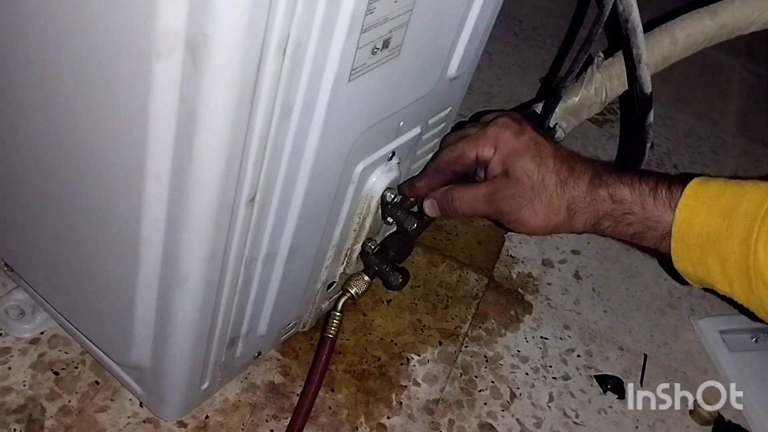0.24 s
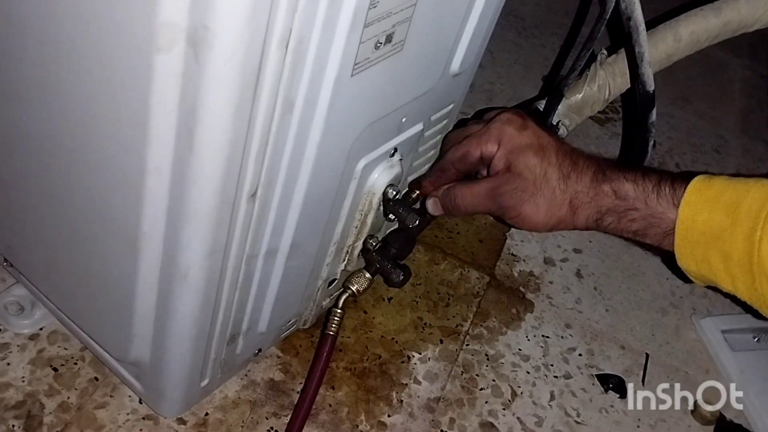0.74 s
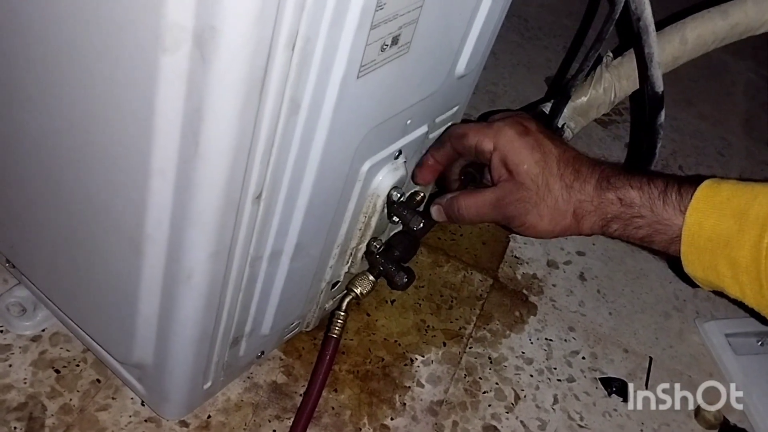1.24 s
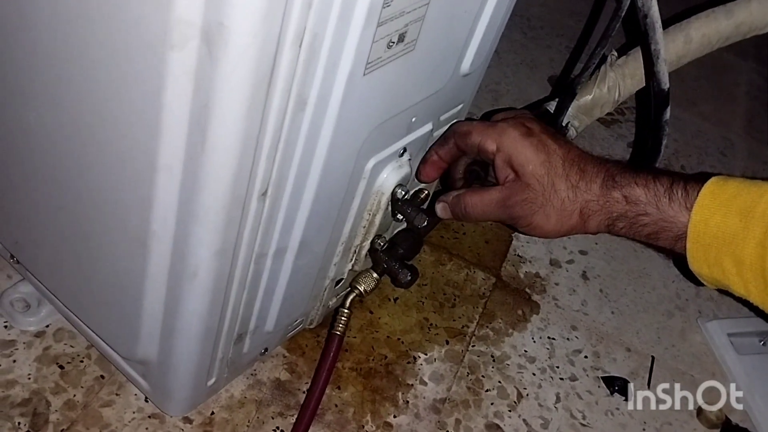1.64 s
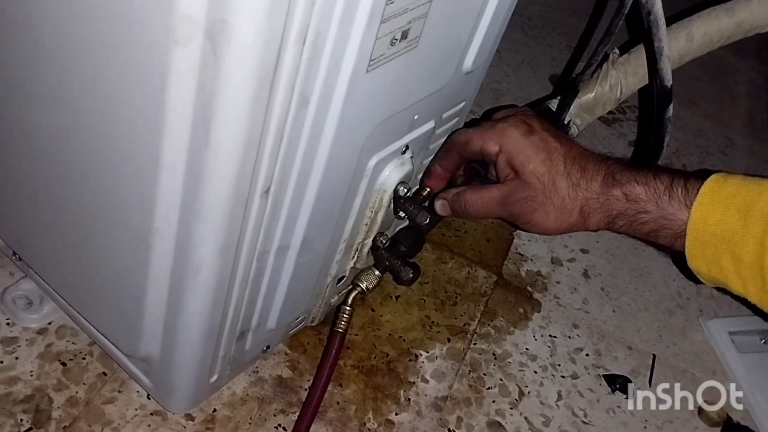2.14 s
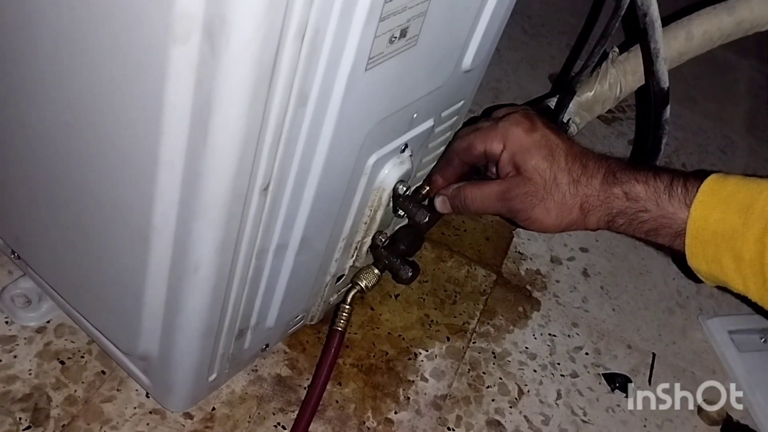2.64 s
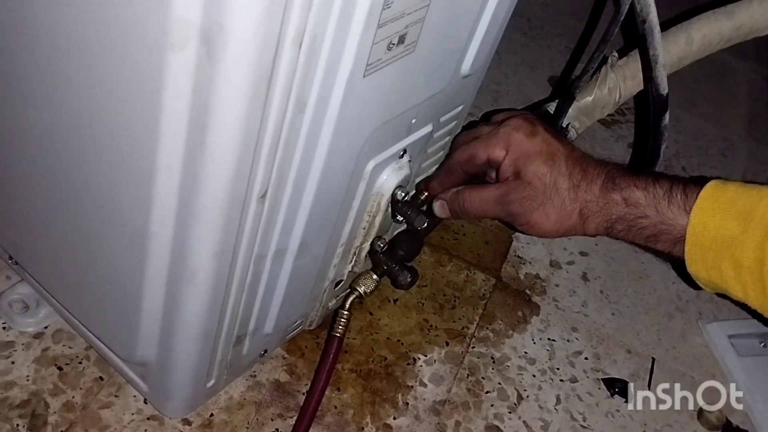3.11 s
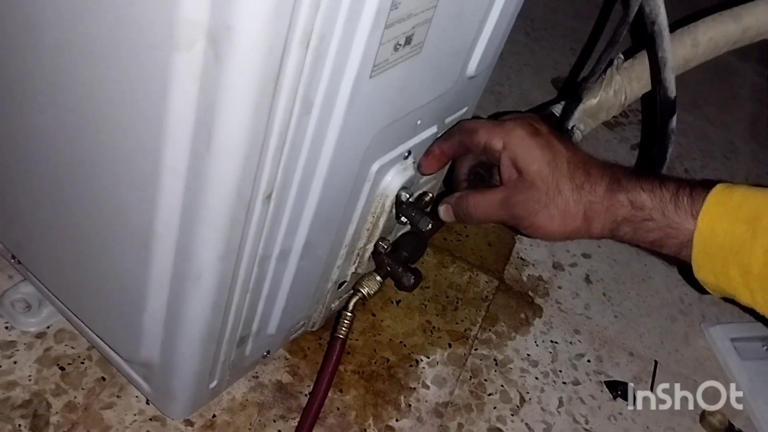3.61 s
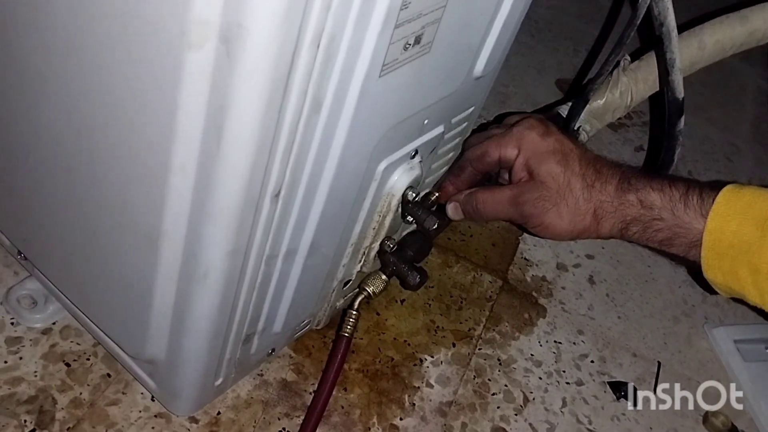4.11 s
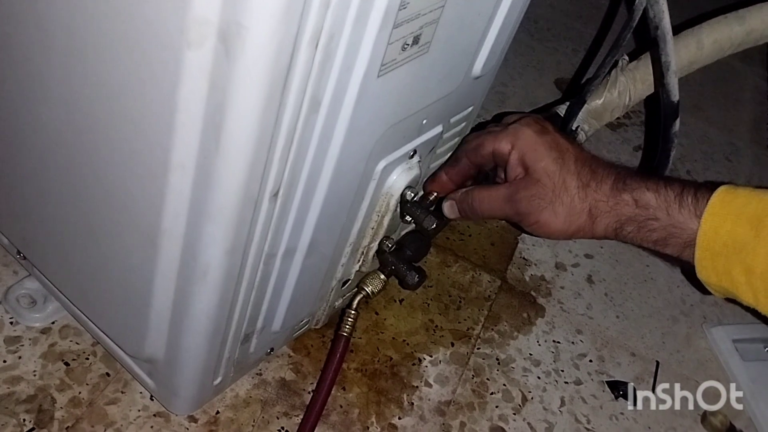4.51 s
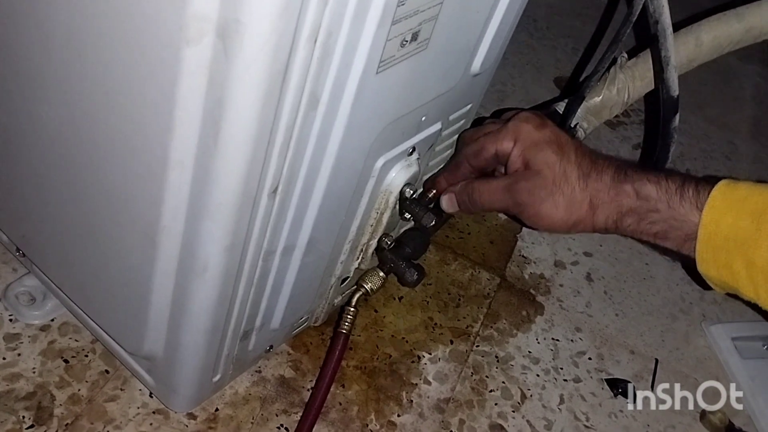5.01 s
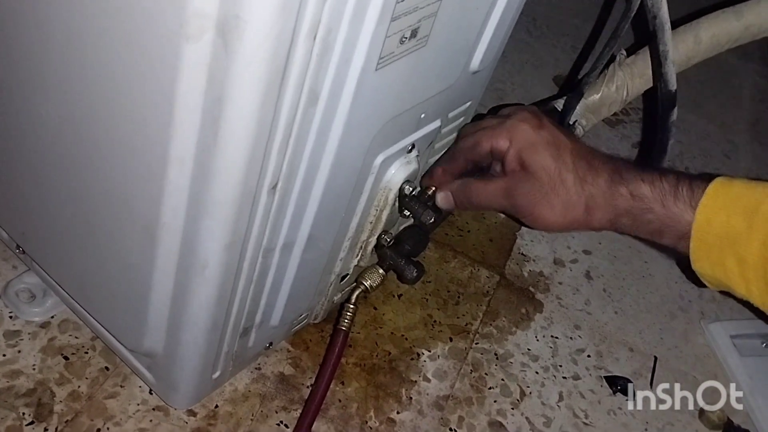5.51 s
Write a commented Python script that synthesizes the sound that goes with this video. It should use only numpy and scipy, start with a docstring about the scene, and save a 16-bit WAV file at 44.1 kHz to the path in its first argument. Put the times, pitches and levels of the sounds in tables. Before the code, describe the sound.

Close by, gas escapes from a metal service valve behind a white appliance. A brief spurt gives way to thin, very high hissing, then a loud blast at one second. Later blasts come more often, with breathy whistling between them and wet spluttering. A small hard-walled space, stereo microphone near the valve, with faint low machine hum underneath.

```python
"""Hissing refrigerant valve

Refrigerant escapes from the service valve of an air conditioner while fingers work its loose cap.
Coloured noise makes the broad jet and its bright blasts; noise rung through resonances makes the thin,
very high hiss and whistle of the pinched gap. Twice the leak almost shuts. Bubble rings and bursts of
noise make the splutter, spits and small ticks. Hard walls stand close, and a machine hums faintly.
"""
import sys
import numpy as np
from scipy import signal
from scipy.fft import rfft, irfft, next_fast_len
from scipy.io import wavfile
from scipy.ndimage import uniform_filter1d, map_coordinates

SR = 44100
rng = np.random.default_rng(int(sys.argv[2]) if len(sys.argv) > 2 else 0)


def to_wav(s):
    """Save 16-bit WAV."""
    ch = np.atleast_2d(s).T  # columns
    pcm = np.round(np.clip(ch, -1, 1) * 32767)  # PCM
    wavfile.write(sys.argv[1], SR, pcm.astype(np.int16))


N = 253575  # length in samples

# Event levels are relative: layer trims, the room and the gain control act on them afterwards.
# A resonance's width_hz spans the points 7 dB below its peak.

# Steady leak as the fingers ease and press the cap: start_s, level_db
LEAK = [(0, -47), (.47, -48), (.72, -43), (1.33, -47.5), (2.04, -47), (2.26, -42.5), (2.36, -37),
        (2.62, -40), (3.06, -43.5), (3.3, -36), (3.48, -42), (4.17, -39.5), (4.24, -46.5), (4.5, -40.5),
        (4.72, -34), (5.3, -40.5), (5.67, -25.5), (5.75, -27)]
# Cap pressed shut: close_s, choke_db_per_s, release_s
SHUTS = [(0.78, 181, 1.033), (4.71, 137, 5.033)]
# Gap thrown wide open: start_s, rise_s, hold_s, fall_s, jet_db, rush_db, sizzle_db
BLASTS = [(0.082, 0.024, 0.025, 0.012, -37, -43, -40), (1.032, 0.02, 0.22, 0.039, -26.5, -25.5, -24.5),
          (2.024, 0.065, 0.07, 0.024, -35, -24.7, -33.5), (2.529, 0.082, 0.016, 0.042, -35.5, -33.5, -41),
          (3.486, 0.093, 0.19, 0.092, -28.5, -23.5, -23.5), (4.498, 0.078, 0.099, 0.024, -36.3, -19.5, -25),
          (5.018, 0.04, 0.065, 0.061, -23.5, -31, -26.3), (5.327, 0.081, 0.19, .05, -43, -35.5, -49),
          (5.528, 0.028, 0.26, 0.045, -28.5, -34, -30)]
# Gas squeezing through the seated cap: start_s, hold_s, lower_db, upper_db, upper_shift_hz
SEATED = [(-.05, 0.044, -56, -39, -2), (0.087, 0.38, -43.5, -31.5, -36), (0.359, 0.0945, -41.5, -45.5, -2),
          (1.29, 0.814, -40, -31.5, 61)]
# Gas whistling past the tilted cap: start_s, rise_s, hold_s, whistle_db, hiss_db
TILTED = [(0.366, 0.076, 0.064, -31, -46), (0.527, 0.03, 0.098, -36, -41.5),
          (2.104, 0.051, 0.087, -32, -41.5), (2.298, 0.042, 0.25, -35, -49),
          (2.662, 0.068, 0.19, -33.5, -45), (2.858, 0.095, 0.064, -27.5, -38),
          (3.06, .05, 0.22, -35.5, -41.5), (3.84, 0.058, 0.18, -36.5, -49),
          (4.178, 0.015, 0.34, -28.5, -34), (4.433, 0.087, 0.045, -26, -42),
          (5.179, 0.039, 0.06, -31.5, -41)]
# Whistle pitch as the cap tilts: time_s, pitch_hz
WHISTLE_PITCH = [(.45, 15200), (.58, 14470), (2.12, 14750), (2.26, 14450), (2.8, 14480), (3, 14560),
                 (4.15, 14450), (4.22, 14900), (4.45, 14800), (4.6, 14650), (5.3, 14520)]
# Wet gas rasping on the rim of the cap: start_s, hold_s, level_db
RASPS = [(.53, 0.22, -49), (1.032, 0.22, -33), (3.132, 0.26, -37.5), (3.503, 0.14, -37), (5.547, 0.21, -37)]
# Runs of liquid in the jet: start_s, hold_s, gurgle_db, spray_db
LIQUID = [(0.091, 0.017, -40, -40), (0.53, 0.28, -50, -45.5), (1.041, 0.047, -33, -33),
          (1.154, 0.096, -40.5, -40), (2.275, 0.03, -35.5, -44), (2.302, 0.16, -31.5, -38),
          (2.476, 0.13, -42, -38.5), (2.619, 0.036, -39, -42), (2.712, 0.16, -47, -72),
          (3.114, 0.36, -47, -41), (3.481, 0.37, -41, -38), (3.587, 0.032, -30.5, -45),
          (3.95, 0.012, -31, -30), (3.981, 0.03, -27.5, -34.5), (4.049, 0.13, -32.5, -39),
          (4.746, 0.06, -49, -46.5), (5.043, 0.03, -29, -25), (5.548, 0.0033, -24.5, -41),
          (5.597, 0.036, -32.5, -43), (5.634, .1, -32, -30.5)]
# Short spits of liquid and small ticks of the cap: start_s, spray_db, hiss_db, thump_db, length_s
SPITS = [(2.178, -38.5, -29, -68, 0.034), (2.364, -32.5, -55, -61, 0.063), (3.6, -42, -31, -17, 0.018),
         (3.958, -30.5, -25, -51, 0.023), (4.063, -27.5, -33, -60, 0.014), (4.097, -34, -42, -55, .013),
         (4.187, -34.5, -21, -9.5, 0.021), (4.306, -39, -55, -60, 0.0057), (4.664, -37, -43, -55, .009),
         (5.562, -43, -30, -8, 0.033)]
# Centre of the dip in the hiss: time_s, centre_hz
HOLLOW = [(.2, 3560), (.5, 3450), (1.4, 3330), (1.7, 3450), (2, 3380), (2.9, 3380), (3.05, 3200),
          (4.2, 4530)]

# Noise spectra of jet, blast rush, blast sizzle, liquid spray and surroundings: frequency_hz, level_db
JET_COLOUR = [(100, -9), (300, 1), (700, -2.5), (1450, 2.05), (2100, 1.5), (2550, 2.9), (3200, 4.5),
              (3500, 6), (4000, 4.5), (5500, 4), (7100, 4), (8200, -20), (9200, -2.5), (11200, -6.5),
              (12600, 4.5), (14200, 4.5)]
RUSH_COLOUR = [(1500, -17.5), (2900, -8), (3450, -17), (3900, -1.5), (4900, 3), (5600, 2.5), (6800, 2.5),
               (7500, -5), (8400, -21), (9300, -5.5), (10250, -7), (11200, -23), (13000, -8)]
SIZZLE_COLOUR = [(7000, -13), (8250, -13.5), (9100, -9), (10100, -6), (11200, -9.5), (12300, 2),
                 (13500, -2), (14500, 4.5)]
SPRAY_COLOUR = [(350, -15), (700, 2), (1050, 8), (1350, 8), (1800, 8), (2000, 8), (2800, -27)]
AMBIENT_COLOUR = [(15, -43), (25, 0), (43, 1.5), (66, -2), (82, -4), (116, -2), (240, -6.5), (322, -14),
                  (410, -15), (848, -30.5), (1400, -25.5), (3440, -45.5), (9300, -65), (10900, -31.5),
                  (15500, -39)]

# Resonances of the gap (seated low and high, tilted hiss) and the rasping rim: centre_hz, width_hz, level_db
SEATED_LOW = [(3180, 110, -3), (4190, 460, 2.5), (5060, 850, 5), (5720, 930, -1), (6740, 1450, -2.5)]
SEATED_HIGH = [(8350, 500, -26), (9100, 1000, -15), (10000, 700, -22), (11900, 1100, -19),
               (12580, 850, -12.5), (13850, 450, -18), (14500, 700, -11), (15100, 800, -4.5),
               (15600, 550, 0)]
TILTED_MODES = [(5500, 1900, -5), (6600, 800, -3), (8700, 1500, -4), (10400, 1200, -6.5), (12150, 750, 3.5),
                (15600, 700, 7)]
RASP_MODES = [(1650, 300, 0), (1960, 370, 4.5), (3220, 1100, -0.5), (4900, 3300, -6)]
# The whistle and its shoulders, before sliding: centre_hz, width_hz, level_db
WHISTLE_MODES = [(14100, 600, -14), (14900, 560, 0), (15400, 800, -11)]
# The pipe booming under the boiling liquid: centre_hz, width_hz, level_db
GURGLE_MODES = [(190, 70, -8.5), (258, 62, 1.5), (341, 64, -2.5), (399, 80, -0.5), (539, 34, -5),
                (697, 190, -9.5)]
# Narrow cabinet resonances added to every valve sound: centre_hz, width_hz, level_db
CABINET = [(1020, 84, 3.5), (1330, 50, 3.5), (1444, 56, 1), (1650, 82, -0.5), (1932, 96, 3.5),
           (2634, 91, 0), (3330, 100, -12), (3780, 47, 4), (4820, 110, 3), (5100, 140, 3), (5720, 100, -1),
           (6100, 59, -3), (6300, 89, -3.5), (13000, 110, -14)]
# Machine hum: pitch_hz, level_db
HUM = [(117.5, -50.5), (409, -64.5), (545, -78)]

# Stereo lean of the broad jet and of the narrow gap: frequency_hz, left_minus_right_db
JET_SIDE = [(100, 0), (300, -2), (850, 2), (1450, -4), (2300, 1), (3500, 4), (4900, -2), (5700, 0),
            (6800, -6), (7900, 0), (9200, 2.5), (10200, 4), (11700, 6), (14400, 5.5), (15600, 2)]
GAP_SIDE = [(4000, 0), (6800, -3), (9000, 3), (10500, 2), (12400, 8), (14500, 5), (15500, 2.5)]
# Left-right likeness of broad sounds, compact gap and rumble: frequency_hz, correlation (-1 to 1)
ALIKE = [(30, 0.47), (120, 1), (300, 1), (950, 0.8), (1900, 0.8), (2600, 0.48), (4000, 0.23), (6000, 0.19),
         (9000, 0.026)]
GAP_ALIKE = [(3000, 1), (4000, 1), (7000, 0.069), (11000, 0.067), (15000, 0.35)]
AMBIENT_ALIKE = [(30, 0.071), (70, 1), (130, 1), (400, 0.72), (3000, -0.38)]
# Phase between the channels: frequency_hz, left_lead_rad
LEFT_LEADS = [(450, 0), (750, 1), (1000, -.5), (1350, .7), (2000, 1.7), (2500, 1.1), (3150, 2.3),
              (3450, 2.8), (3850, 0), (4400, 0), (5100, 1.3), (6400, 1.7), (8000, 0), (10000, -1),
              (12000, -2.2), (15000, 1.7)]
# Close reflections: delay_s, left_gain, right_gain
ECHOES = [(.0011, -0.056, -0.13), (.00128, 0.14, 0.1), (.00165, -.11, 0.09)]

TOP_HZ = 15760  # upper band limit
WHISTLE_HZ = 14900  # centre of the whistle before it slides
JET_SAG_DB_PER_S, SIZZLE_SAG_DB_PER_S = 34, 18  # a blast weakens as the pressure behind it drops
SEAT_RISE_S, SEAT_FALL_S, SEAT_GROWS_DB_PER_S = 0.05, 0.049, 1
TILT_FALL_S, TILT_SAG_DB_PER_S = 0.065, 11
LIQUID_RISE_S, LIQUID_FALL_S, DRAIN_DB_PER_S = 0.014, 0.027, 21.5
SHUT_DB, REOPEN_S = -25.5, 0.0014  # how far the leak dies; how fast it returns
HOLLOW_WIDTH_HZ, HOLLOW_DEPTH = 250, 0.97  # half width; greatest share removed


def jet_flow():
    """Strength of the broad jet: the leak, choked while the cap is shut, plus the blasts."""
    t = np.arange(N) / SR
    leak_db = np.interp(t, *np.transpose(LEAK))
    for close, db_per_s, release in SHUTS:
        choke_db = np.maximum(-db_per_s * np.maximum(t - close, 0), SHUT_DB)
        leak_db = leak_db + choke_db * np.clip(1 - (t - release) / REOPEN_S, 0, 1)
    openings = [amp(db) * stroke(*shape, JET_SAG_DB_PER_S) for *shape, db, _, _ in BLASTS]
    return together([amp(leak_db)] + openings)


def jet(flow, level_db=6.0, flutter_db=1.0):
    """The broad rush of escaping gas: coloured noise that follows the flow and trembles at random."""
    gain = flow * amp(level_db + flutter_db * wobble(120))
    return gain * turbulence(colour(JET_COLOUR), JET_SIDE)


def blasts(rush_db=0.0, sizzle_db=6, flutter_db=0.9, surge_db=0.6):
    """With the gap wide open the jet turns much brighter and surges unevenly."""
    rush = together(amp(db) * stroke(*shape) for *shape, _, db, _ in BLASTS)
    sizzle = together(amp(db) * stroke(*shape, SIZZLE_SAG_DB_PER_S) for *shape, _, _, db in BLASTS)
    surge = amp(rush_db + surge_db * wobble(28))
    low = rush * surge * turbulence(colour(RUSH_COLOUR), JET_SIDE)
    high = sizzle * amp(sizzle_db) * turbulence(colour(SIZZLE_COLOUR), JET_SIDE)
    high = high * amp([[1.5], [-3]])  # sizzle leans further left
    return (low + high) * amp(flutter_db * wobble(190))


def seated_hiss(flow, low_db=2.5, high_db=4, flutter_db=0.5, drift_db=1.8, waver_hz=45):
    """The narrow gap rings in resonances that waver under the fingers; the upper ones also flutter."""
    gains = np.array([
        amp([[lower], [upper]]) * stroke(s, SEAT_RISE_S, hold, SEAT_FALL_S, -SEAT_GROWS_DB_PER_S)
        for s, hold, lower, upper, _ in SEATED])
    low, high = together(gains)
    body = low * amp(low_db) * turbulence(resonances(SEATED_LOW), GAP_SIDE, GAP_ALIKE)
    body = slid(body, waver_hz * wobble(9))
    shift_hz = blend(np.array(SEATED)[:, -1], gains[:, 1]) + waver_hz * wobble(8.1)
    edge = slid(turbulence(resonances(SEATED_HIGH), GAP_SIDE, GAP_ALIKE), shift_hz)
    edge_gain = amp(high_db + flutter_db * wobble(260) + drift_db * wobble(7.0))
    return body + narrow(high, flow) * edge_gain * edge


def tilted_hiss(flow, whistle_db=3, hiss_db=3, flutter_db=0.9, waver_hz=45):
    """A breathy whistle slides as the cap moves, over a ringing hiss; both give way as the jet opens."""
    whistle, hiss = together(
        amp([[high], [low]]) * stroke(s, rise, hold, TILT_FALL_S, TILT_SAG_DB_PER_S)
        for s, rise, hold, high, low in TILTED)
    pitch_hz = np.interp(np.arange(N) / SR, *np.transpose(WHISTLE_PITCH)) + waver_hz * wobble(12)
    breath = turbulence(resonances(WHISTLE_MODES), GAP_SIDE, GAP_ALIKE)
    tone = amp(whistle_db) * slid(breath, pitch_hz - WHISTLE_HZ)
    body = amp(hiss_db) * turbulence(resonances(TILTED_MODES), GAP_SIDE, GAP_ALIKE)
    both = narrow(whistle, flow) * tone + narrow(hiss, flow, damping=1.0) * body
    return both * amp(flutter_db * wobble(180))


def rasp(level_db=0.0, rise_s=0.01, fall_s=0.013, lumpy_db=1.5):
    """Wet gas catches the rim of the cap: a hoarse, fuller hiss that cuts in quickly."""
    gain = together(amp(db) * stroke(s, rise_s, hold, fall_s) for s, hold, db in RASPS)
    lumps = amp(level_db + lumpy_db * wobble(110))
    return gain * lumps * turbulence(resonances(RASP_MODES), JET_SIDE)


def splutter(gurgle_db=0.0, bubble_db=-10, spray_db=-2, droplet_db=-9, lumpy_db=2, surge_db=1.3):
    """Liquid boils through the gap: low bubbles, and spray torn off in lumps."""
    gurgle, spray = together(
        amp([[low], [high]]) * stroke(s, LIQUID_RISE_S, hold, LIQUID_FALL_S, DRAIN_DB_PER_S)
        for s, hold, low, high in LIQUID)
    low = amp(gurgle_db) * turbulence(resonances(GURGLE_MODES), JET_SIDE)
    low = low + amp(bubble_db) * bubbles(rate=290, pitch_hz=289.4, spread=0.793, cycles=8.3, glide=0.01)
    high = amp(spray_db) * turbulence(colour(SPRAY_COLOUR), JET_SIDE)
    high = high + amp(droplet_db) * bubbles(rate=300, pitch_hz=1265, spread=0.484, cycles=13.6, glide=0.0069)
    boiling = gurgle * low * amp(surge_db * wobble(55))
    torn = spray * high * amp(lumpy_db * wobble(90)) * amp([[-1], [1]])  # spray leans right
    return boiling + torn


def spits(thump_life=0.0043, left_db=-9, rise_s=0.00052):
    """Spits of liquid and ticks of the cap: each a brief burst of spray and hiss with a push of air."""
    out = np.zeros((2, N))
    spray = turbulence(colour(SPRAY_COLOUR), JET_SIDE)
    hiss = turbulence(colour(JET_COLOUR), JET_SIDE)
    for s, spray_db, hiss_db, thump_db, length in SPITS:
        t = np.maximum(np.arange(N) / SR - s, 0)
        rise = 1 - np.exp(-t / rise_s)
        burst = (amp(spray_db) * spray + amp(hiss_db) * hiss) * np.exp(-(t / length) ** 2)
        pulse = (1 - t / thump_life) * np.exp(-t / thump_life)
        push = amp([[thump_db + left_db], [thump_db]]) * pulse
        out += rise * (burst - push)
    return out


def near_field(x):
    """Cabinet and floor ripple the spectrum and turn its phase between left and right."""
    def response(hz):
        ripple = 1 + sum(np.outer([left, right], np.exp(-2j * np.pi * hz * delay))
                         for delay, left, right in ECHOES)
        ring = np.sqrt(1 + resonances(CABINET)(hz) ** 2)
        return ripple * ring * np.exp(1j * np.outer([.5, -.5], along(LEFT_LEADS, hz)))
    return filtered(x, response)


def walls(x, t60=0.12):
    """The cabinet, floor and walls answer with a short dense tail of decaying noise."""
    t = np.arange(SR // 4) / SR
    tail = rng.standard_normal((2, len(t))) * amp(-60 * t / t60) * (t > .002)
    return signal.fftconvolve(x, tail / np.linalg.norm(tail[0]), axes=1)[:, :N]


def hollowed(x, broad, gap, waver_hz=70):
    """A dip in the hiss near 3.2 to 4.5 kHz, deeper the more the ringing gap outweighs the broad jet."""
    centre_hz = np.interp(np.arange(N) / SR, *np.transpose(HOLLOW)) + waver_hz * wobble(16)
    carrier = np.exp(2j * np.pi * np.cumsum(centre_hz) / SR)

    def band(part):
        # shift the dip's centre to zero, keep the lows, shift back
        return part * filtered(x * part, lambda hz: np.exp(-(hz / HOLLOW_WIDTH_HZ) ** 2))

    def power(sound):
        return np.abs(uniform_filter1d((sound ** 2).sum(0), size=2048))

    share = power(gap) / (power(gap) + power(broad) + 1e-20)
    return x - HOLLOW_DEPTH * share * 2 * (band(carrier.real) + band(carrier.imag))


def background(level_db=-43, drift=0.47):
    """Low ambient rumble from coloured noise, and a machine hum of sines with drifting phase."""
    t = np.arange(N) / SR
    hum = sum(amp(db) * np.sqrt(2) * np.sin(2 * np.pi * hz * t + drift * wobble(5.2)) for hz, db in HUM)
    side = [(30, -6.0), (100, 1.5), (1000, -5.5)]  # frequency_hz, left_minus_right_db
    return hum + amp(level_db) * turbulence(colour(AMBIENT_COLOUR), side, AMBIENT_ALIKE)


def amp(db):
    """Decibels to gain."""
    return 10 ** (np.asarray(db) / 20)


def unit(x):
    """x at rms 1."""
    return x / np.sqrt(np.mean(x ** 2) + 1e-20)


def along(points, hz):
    """(Hz, value) points read on a log frequency axis."""
    f, v = np.transpose(points)
    return np.interp(np.log(hz + 1), np.log(f + 1), v)


def wobble(rate):
    """A smooth random curve, rate knots a second."""
    knots = rng.standard_normal(int(N * rate / SR) + 4)
    return map_coordinates(knots, [np.arange(N) * rate / SR])


def filtered(x, response):
    """x times a response of frequency."""
    m = next_fast_len(N + 8192)
    return irfft(rfft(x, m) * response(np.fft.rfftfreq(m, 1 / SR)), m)[..., :N]


def colour(points):
    """The response of a (Hz, dB) spectrum."""
    return lambda hz: amp(along(points, hz))


def resonances(modes):
    """The response of steep-sided (Hz, width, dB) resonances, added in power."""
    return lambda hz: np.sqrt(sum(amp(db) ** 2 * (1 + 2 * ((hz - centre) / width) ** 2) ** -4
                                  for centre, width, db in modes))


def turbulence(response, side, alike=ALIKE):
    """Stereo noise of rms 1, with likeness between the channels and lean to one side set by band."""
    def mix(hz):
        turn = np.arccos(np.clip(along(alike, hz), -1, 1)) / 2
        return response(hz) * (hz < TOP_HZ) * np.array([np.cos(turn), np.sin(turn)])
    common, apart = filtered(rng.standard_normal((2, N)), mix)
    pair = np.array([common + apart, common - apart])
    return unit(filtered(pair, lambda hz: amp(np.outer([.5, -.5], along(side, hz)))))


def bubbles(rate, pitch_hz, spread, cycles, glide):
    """Short damped rings, rate a second at random times, pitched within spread octaves and sliding."""
    t = np.arange(SR // 25) / SR
    when, tone, size = rng.random((int(rate * N / SR), 3)).T[:, :, None]
    turns = pitch_hz * 2 ** (spread * (2 * tone - 1)) * t
    age = turns / cycles
    envelope = (1.1 + size ** 2) * age * np.exp(-3 * age)
    rings = envelope * np.sin(2 * np.pi * turns * (1 + glide * age))
    places = (when * N).astype(int) + np.arange(len(t))
    return unit(np.bincount(places.ravel(), rings.ravel(), N)[:N])


def narrow(gain, flow, damping=3):
    """The gap rings less the more broad jet passes through it."""
    return gain ** 2 / np.sqrt(gain ** 2 + (damping * flow) ** 2 + 1e-20)


def stroke(start, rise, hold, fall, sag_db=0):
    """One opening of the gap: it swells, holds while sagging so many dB a second, and closes."""
    age = np.arange(N) / SR - start
    opening = np.clip(age / rise, 0, 1) ** 2
    closing = np.exp(-(np.maximum(age - rise - hold, 0) / fall) ** 2)
    return opening * amp(-sag_db * np.clip(age - rise, 0, hold)) * closing


def together(gains):
    """Unrelated noises add in power."""
    return np.sqrt(sum(gain ** 2 for gain in gains))


def slid(x, shift_hz):
    """x with its whole spectrum moved by a curve of Hz."""
    analytic = signal.hilbert(x, next_fast_len(N))[:, :N]
    return np.real(analytic * np.exp(2j * np.pi * np.cumsum(shift_hz) / SR))


def blend(values, gains):
    """A curve of the strokes' values, averaged by their gains."""
    return np.asarray(values) @ gains / (gains.sum(0) + 1e-20)


def levelled(x, threshold_db=-25, slope=0.35, follow_s=0.063, makeup_db=0.35):
    """Gain control: everything ducks under a loud blast and comes back after it."""
    keep = np.exp(-1 / (follow_s * SR))
    power = signal.lfilter([1 - keep], [1, -keep], (x ** 2).mean(0))
    return x * amp(makeup_db) * (1 + power / amp(threshold_db) ** 2) ** (-slope / 2)


def scene():
    """All the sounds of the valve in a small hard space, over the background."""
    flow = jet_flow()
    broad = jet(flow) + blasts()
    gap = seated_hiss(flow) + tilted_hiss(flow)
    valve = near_field(broad + gap + rasp() + splutter() + spits())
    return hollowed(valve + amp(-11.5) * walls(valve), broad, gap) + background()


def record(dry, swell=2.7):
    """After gain control, loud hiss shifts the rest point in a slow swell; the top band is cut."""
    held = levelled(dry)

    def slow(hz):
        # passes roughly 1.3 to 10 Hz of the squared sound
        return (1j * hz / (1.3 + 1j * hz)) ** 2 / (1 + 1j * hz / 10) ** 3

    return filtered(held + swell * filtered(held ** 2, slow), lambda hz: hz < TOP_HZ)


dry = scene()
out = record(dry)
to_wav(out)
```